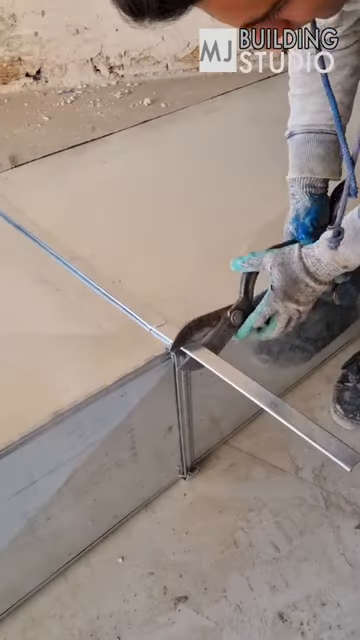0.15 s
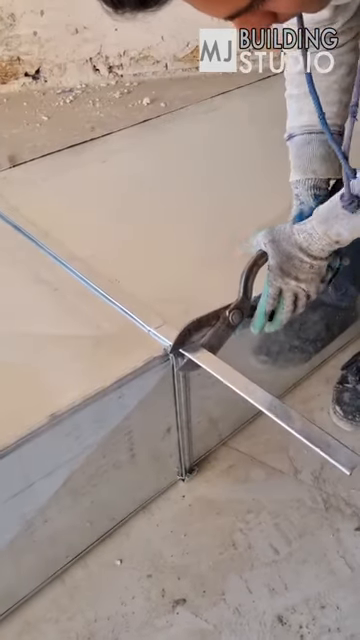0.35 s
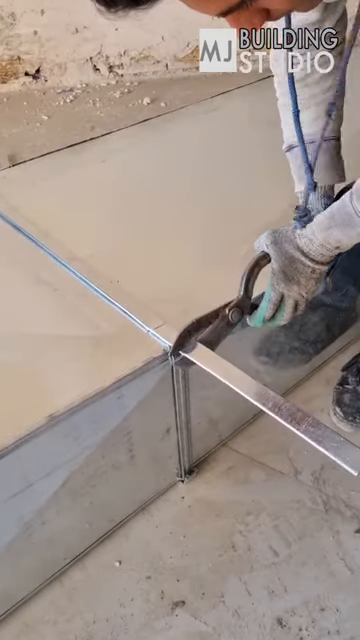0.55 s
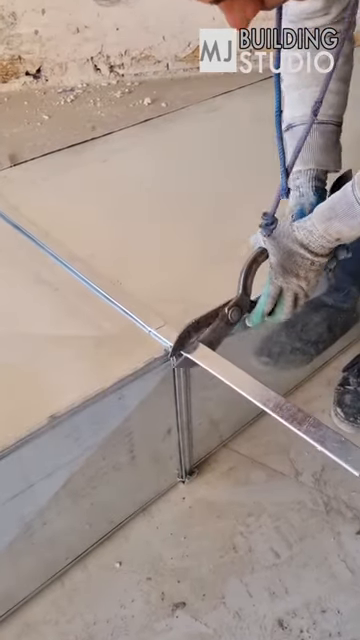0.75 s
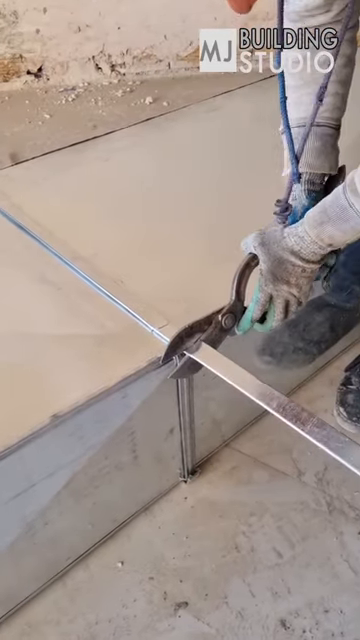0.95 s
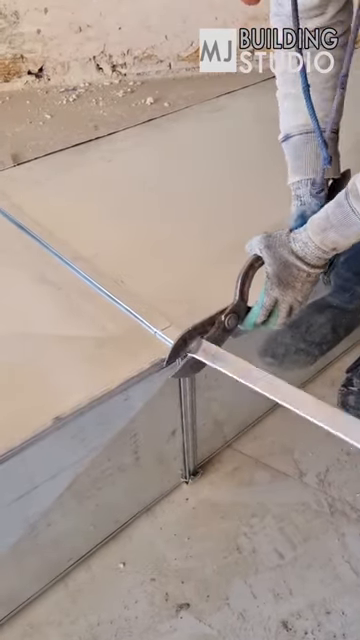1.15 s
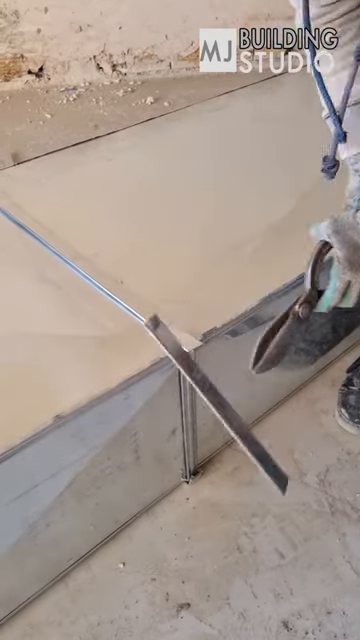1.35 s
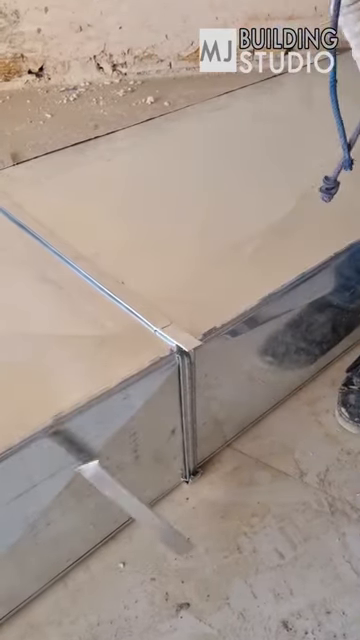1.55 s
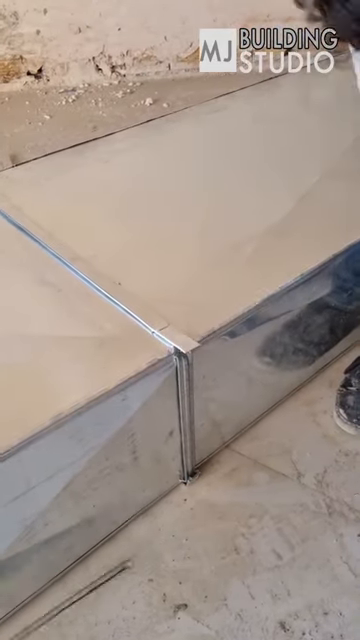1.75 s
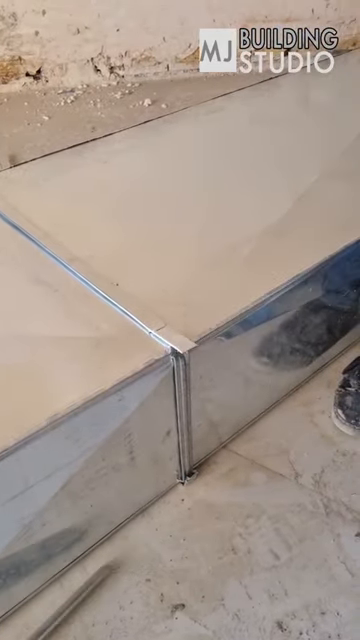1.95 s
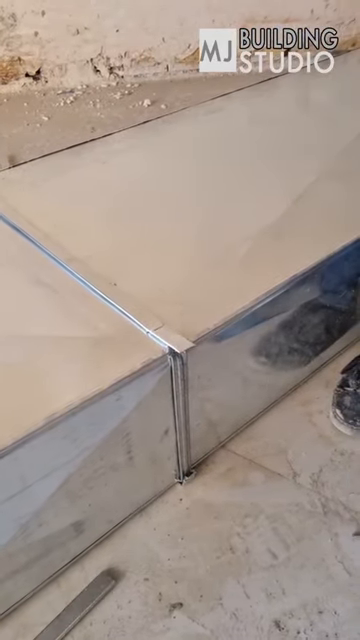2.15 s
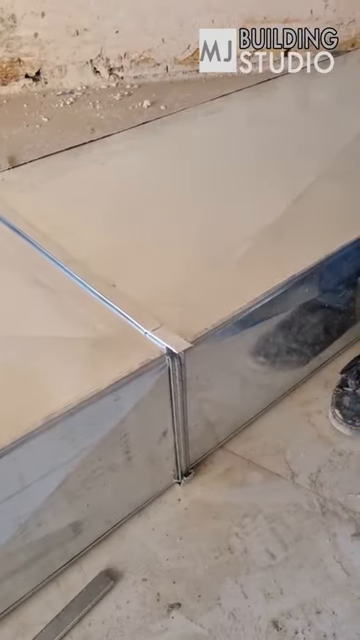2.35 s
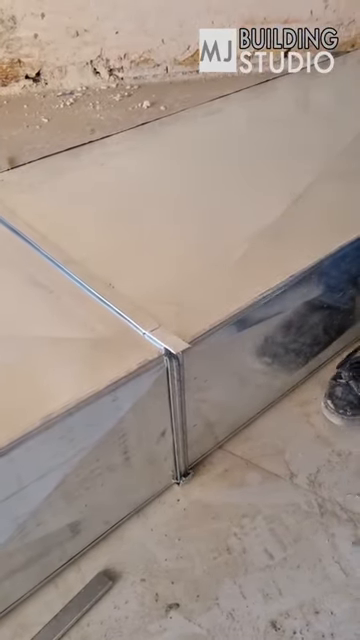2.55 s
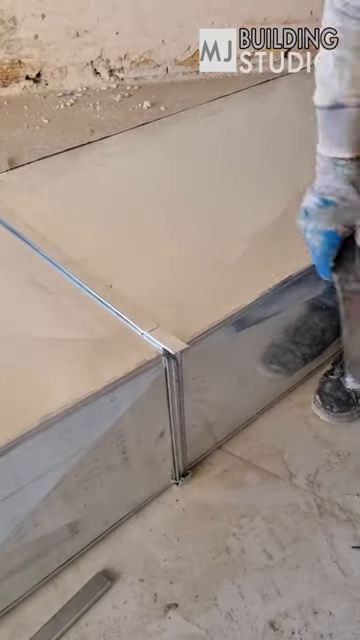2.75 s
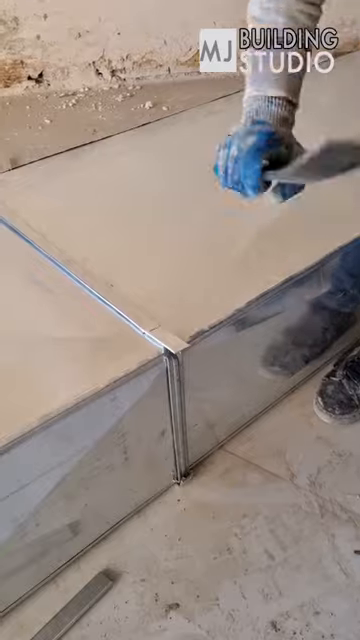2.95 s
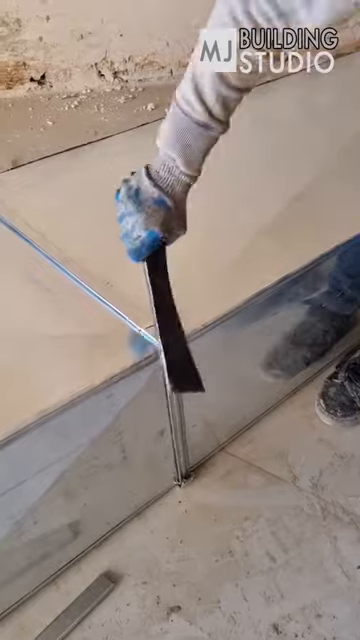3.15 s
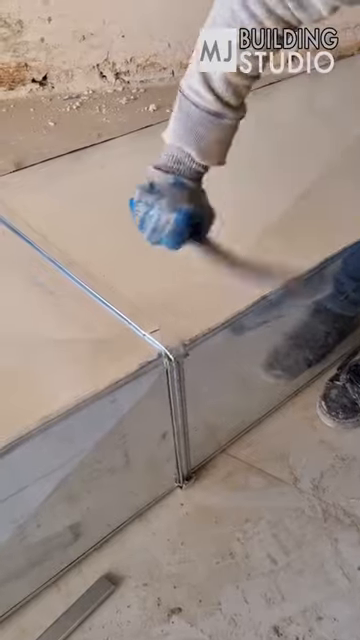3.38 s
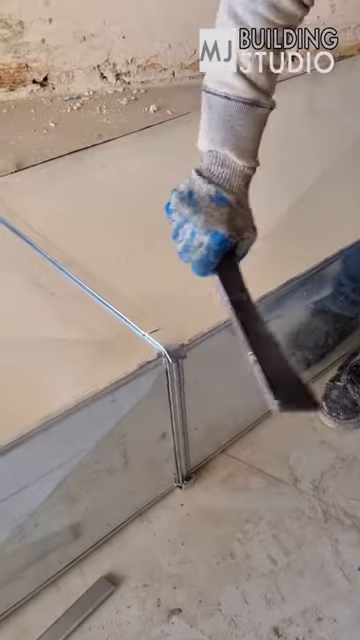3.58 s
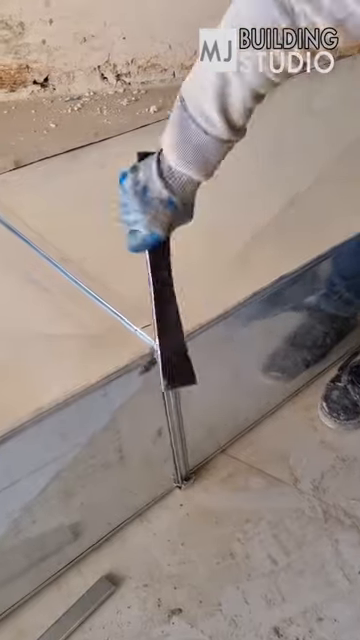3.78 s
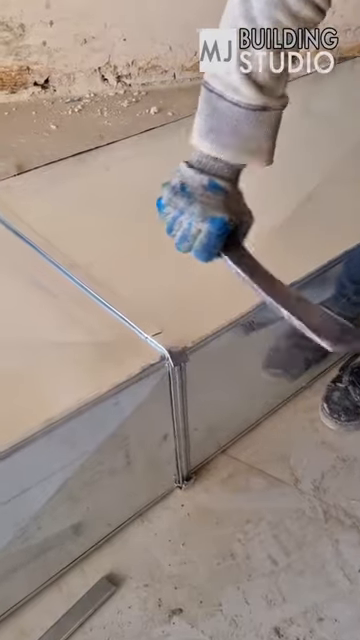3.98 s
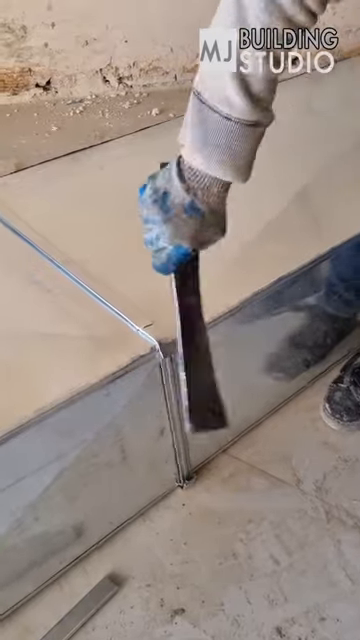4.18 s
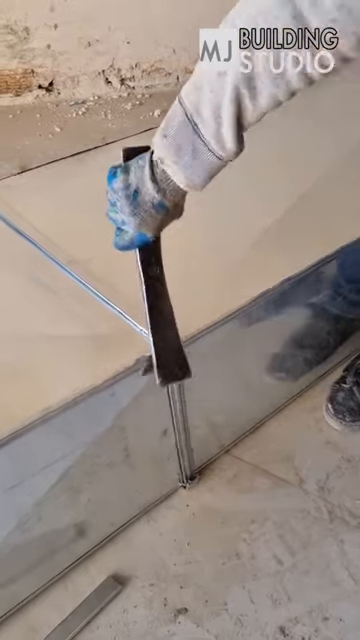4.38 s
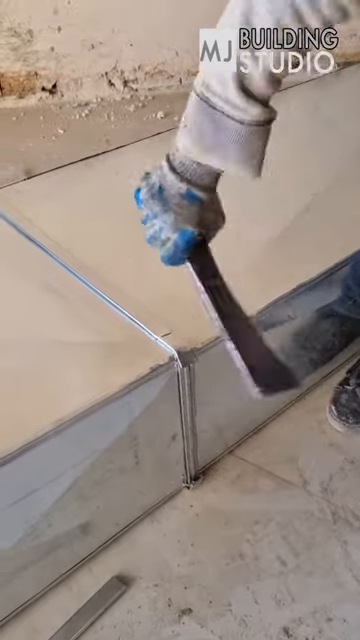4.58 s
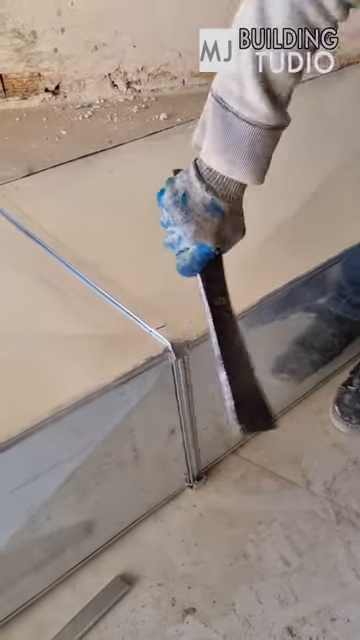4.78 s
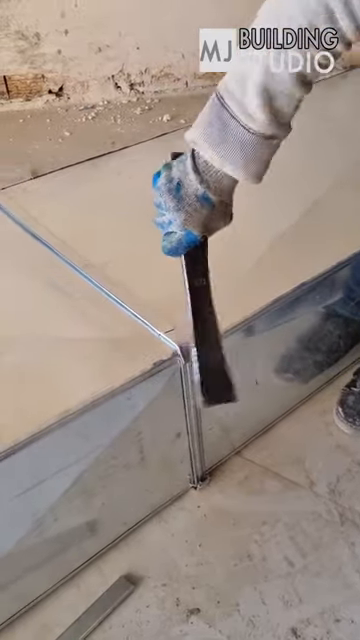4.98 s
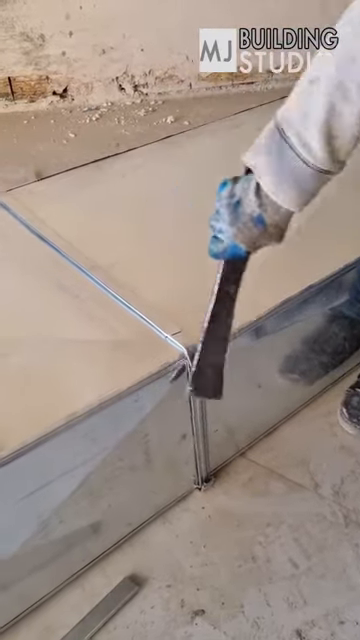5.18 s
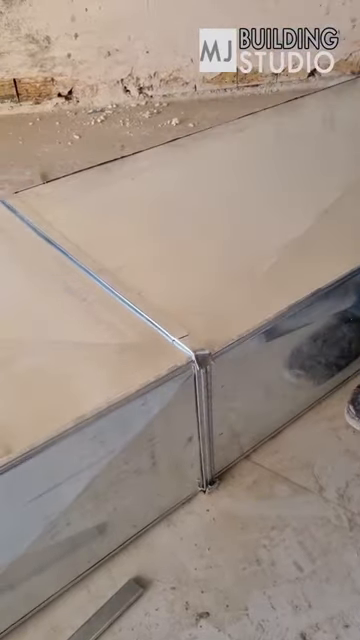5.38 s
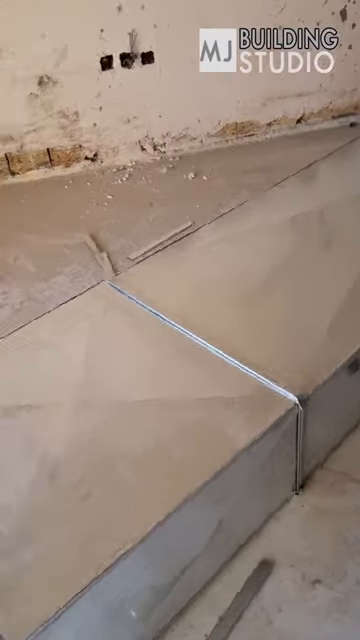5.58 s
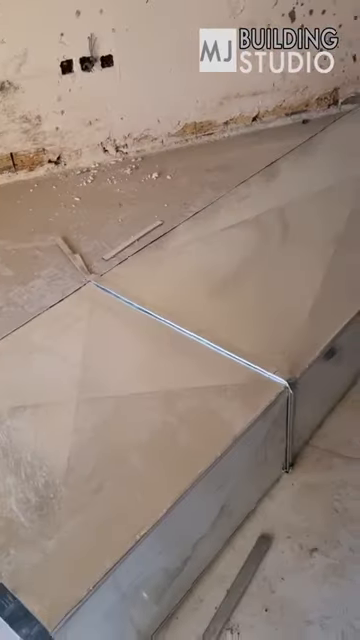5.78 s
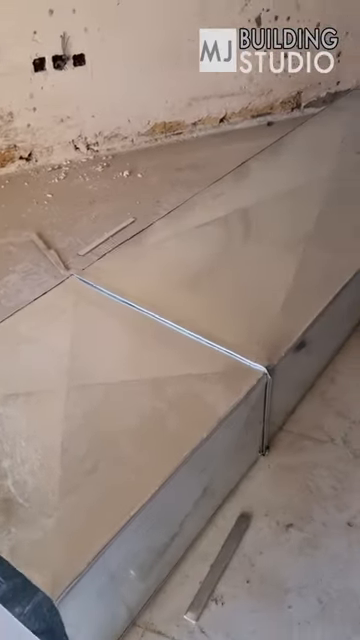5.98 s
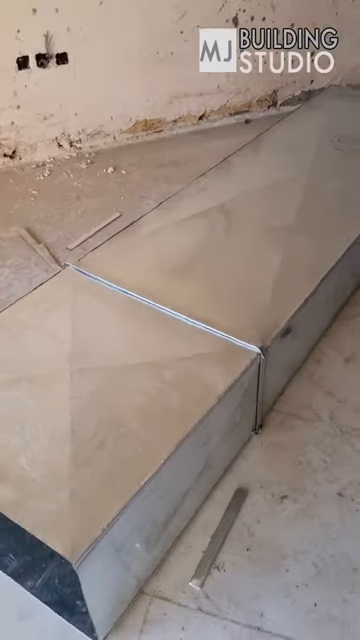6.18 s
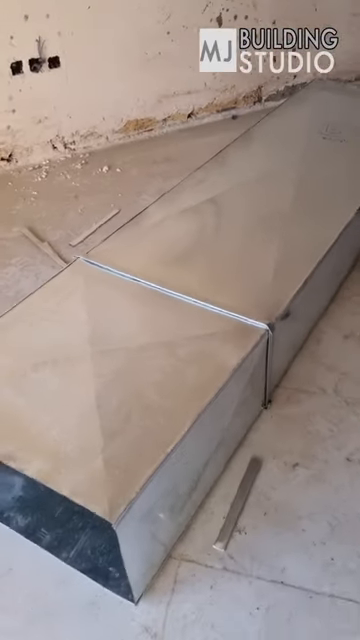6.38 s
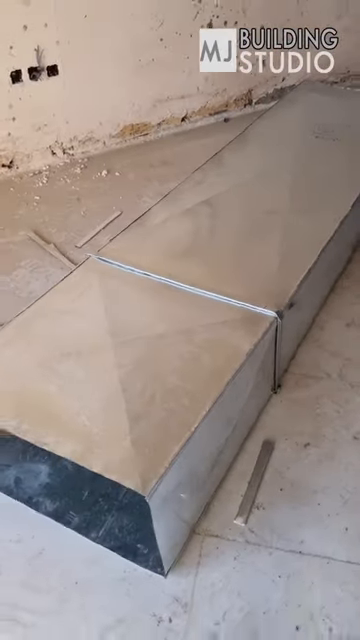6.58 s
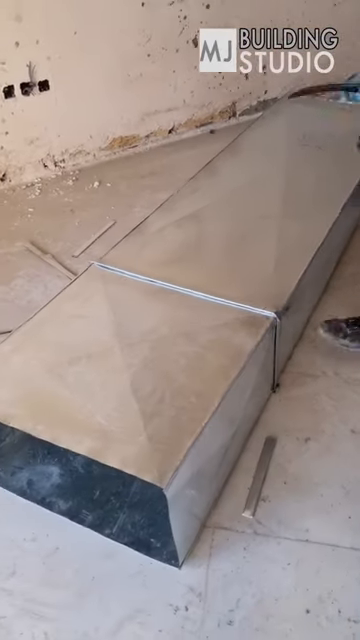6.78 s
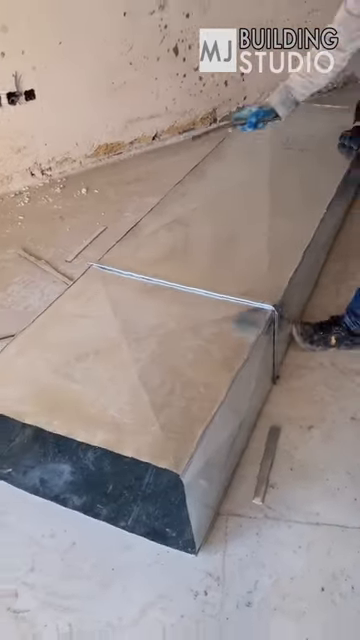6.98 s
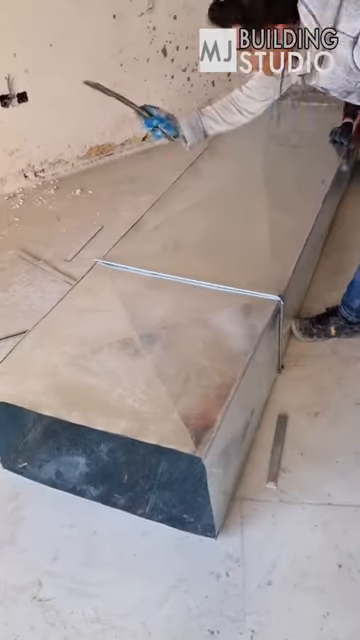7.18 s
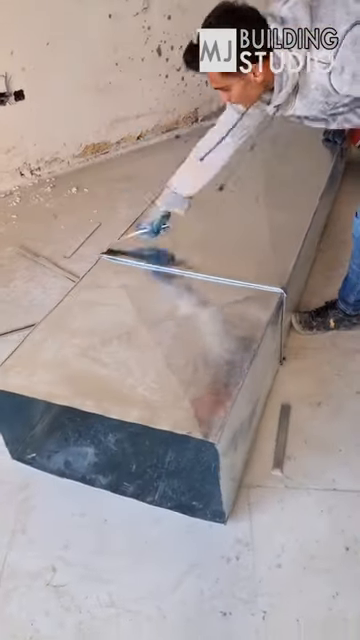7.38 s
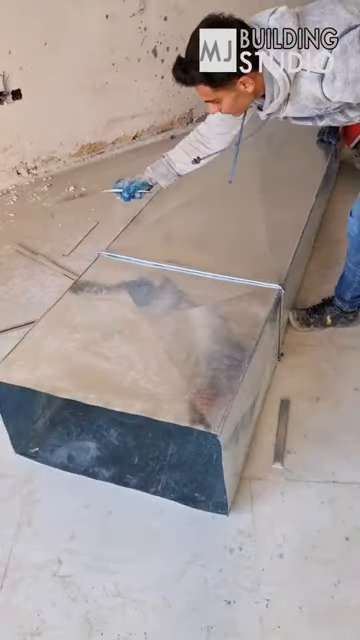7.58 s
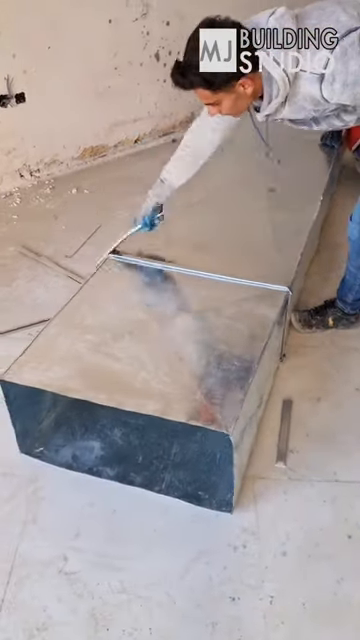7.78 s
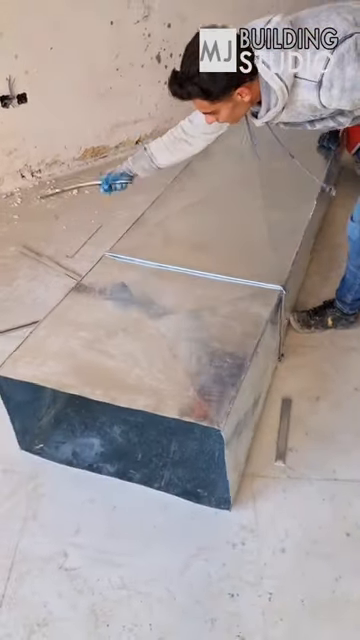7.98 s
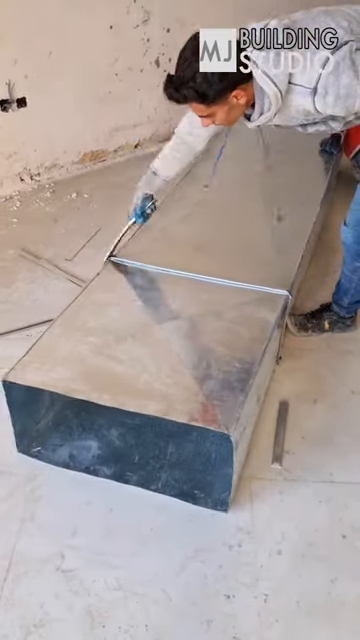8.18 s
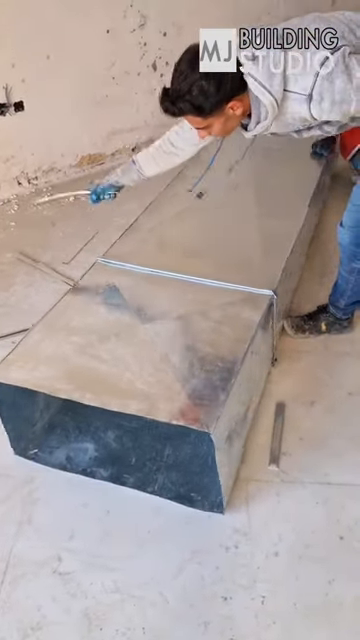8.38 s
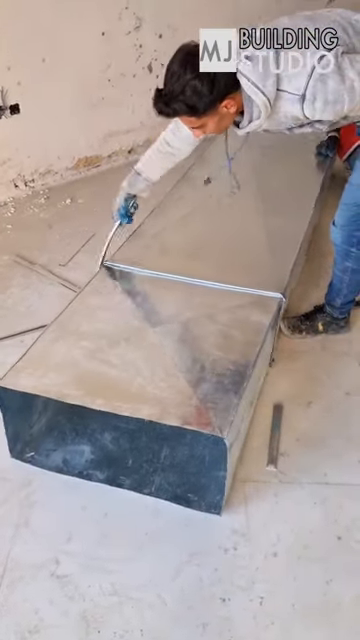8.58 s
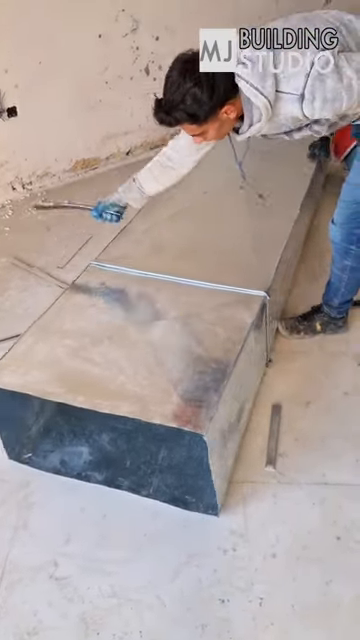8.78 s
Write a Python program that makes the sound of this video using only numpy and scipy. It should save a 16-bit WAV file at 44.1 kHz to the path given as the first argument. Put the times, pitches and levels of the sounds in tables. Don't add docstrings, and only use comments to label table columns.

```python
import sys
import numpy as np
from scipy import signal
from scipy.fft import rfft, irfft, next_fast_len
from scipy.io import wavfile
from scipy.ndimage import uniform_filter1d

SR = 44100
rng = np.random.default_rng(int(sys.argv[2]) if len(sys.argv) > 2 else 0)


def materialize(psi):
    bounded = np.clip(np.atleast_2d(psi).T, -1, 1)
    quanta = np.round(bounded * 32767).astype(np.int16)
    wavfile.write(sys.argv[1], SR, quanta)


def undo_db(level):
    steps = np.asarray(level, float) / 20
    return 10 ** steps


N = 389844
FAST = next_fast_len(N)
FREQ = np.fft.rfftfreq(FAST, 1 / SR)
TIME = np.arange(N) / SR
BANDS_HZ = 40 * 2 ** np.arange(0, 8.8, 1 / 3)

# time in seconds, level in dB.
SITE_LEVEL = [(0, -23.5), (.36, -32), (.8, -26.5), (1.2, -34.5), (1.5, -32.5), (2.0, -39), (2.35, -42.5),
              (2.7, -41), (3.14, -41.5), (5.6, -34), (5.77, -36), (6.0, -32.5), (6.5, -30.5), (6.8, -31.5),
              (6.97, -26.5), (7.3, -30.5), (8.8, -33.5)]
# frequency in Hz, density in dB per Hz.
SITE_COLOUR = [(21, -35), (35, -17), (60, -5), (115, -11), (165, -10), (230, -9.5), (340, -11), (560, -15),
               (800, -13), (1550, -17), (2300, -18), (4800, -27.5), (7000, -34.5), (14800, -46.5)]
SITE_PARTS_HZ = [110, 600, 3000, 10000]
SITE_PARTS_DB = [-1.5, 0.1, -14, -28]
# frequency in Hz, width in Hz, level in dB.
DRONE_RESONANCES = [(58, 1.5, 6), (115, 6, -5), (228, 9, 0), (345, 7, -2), (410, 7, -7), (455, 7, -6),
                    (515, 7, -5)]
# start in seconds, hold in seconds, level in dB, centre in Hz.
SHOVES = [
    (.25, .95, -31, 89),
    (0.597, .16, -20, 89),
    (1.415, .08, -26, 99),
    (1.93, .12, -36, 654),
    (2.3, 0.94, -47.5, 99),
    (6.94, .4, -24, 130),
]
# start in seconds, hold in seconds, level in dB, centre in Hz.
SCRAPES = [
    (.46, 0.11, -48, 12500),
    (.8, .52, -44.5, 12500),
    (1.3, .08, -36.5, 2590),
    (1.76, 0.38, -35, 2500),
    (2.07, .07, -43, 10000),
    (2.3, 0.24, -55, 12500),
    (2.3, 0.17, -45, 3420),
    (6.26, 0.1, -60, 9000),
    (7.06, 0.16, -52.5, 7950),
]
# time in seconds, level in dB, top panel level in dB.
BUMPS = [
    (.585, -17.5, -2),
    (.64, -20.5, -12),
    (1.262, -20, 0),
    (6.925, -16, -3.5),
    (6.992, -22.5, 1.1),
    (7.079, -23, 0.5),
    (7.22, -23, -3),
]
# time in seconds, peak in dB, boom in dB, brightness in dB per octave.
SNIPS = [(0.2086, -29, -6, -4), (0.3216, -35, -25, -17), (0.454, -32, 3, 1.5), (0.5826, -20, 20, -2.5),
         (0.631, -4, -7.5, -4.5), (0.8794, -27, 5, -10.5), (1.0077, -37, -5, 7), (1.1344, -36, -3, -1),
         (1.2487, -8.5, 5, 1.5), (1.269, -13, -5, -7), (2.522, -38.5, 6, -1.5), (2.6628, -40, 11, 1),
         (5.642, -32.5, -16, 0.5), (6.2394, -40, -3, 4), (6.9294, -43, 10, 1), (7.1294, -33, -2, -3),
         (7.2994, -36, -10, -10)]
# frequency in Hz, density in dB per Hz.
BITE_COLOUR = [(21, -36), (35, -4.5), (129, 1.5), (443, -18), (516, -24), (602, -14.5), (1550, -35),
               (2220, -16.5), (3710, -8.5), (6690, -8), (9830, -17), (14400, -11), (16000, -12)]
# time in seconds, ring in Hz, level in dB.
JAWS = [
    (0.3216, 3520, -48),
    (0.454, 2160, -42.5),
    (0.5826, 3250, -29),
    (0.631, 2320, -18.5),
    (1.249, 5250, -18.5),
    (6.9294, 1970, -42.5),
]
# time in seconds, peak in dB, note woken most in Hz, its lift in dB.
LANDINGS = [(1.5667, -11.5, 3170, 4.5), (1.7582, -20, 4000, -6), (1.779, -23.5, 7300, 6),
            (1.825, -32.5, 1895, 22), (1.859, -14, 3900, 0), (1.885, -32.5, 1895, 22),
            (1.923, -23.5, 3300, 5), (2.022, -27.5, 7350, 7), (2.046, -19.5, 7300, 1),
            (2.0717, -19.5, 5800, -2), (2.161, -21, 3300, 5), (2.191, -30, 2600, 20.5),
            (2.23, -30, 2560, 23), (2.29, -37, 2600, 20), (2.35, -41, 4100, 9)]
# time in seconds, level in dB.
CHATTER = [(1.74, -84), (1.77, -29), (1.85, -30), (2.0, -30.5), (2.08, -17), (2.14, -24), (2.22, -25.5),
           (2.3, -37), (2.4, -70)]
# time in seconds, frequency in Hz, level in dB, fade in ms.
CLANGS = [(.3235, 3600, -21, 9), (.5855, 3550, -17, 8), (1.2696, 6600, -13, 7), (1.5672, 4000, -5, 6),
          (1.5672, 7600, -12, 7), (1.5672, 1050, -22, 8), (1.5672, 5600, -16, 6), (1.8595, 7400, -1, 3.5),
          (1.8595, 7800, -12, 3), (1.873, 7350, -13, 6), (2.047, 7350, -15, 5), (2.524, 3300, -36, 6),
          (2.663, 4700, -40, 5)]
# frequency in Hz, level in dB, t60 in seconds.
STRIP_MODES = [(1755, -22, .4), (1895, -11, .45), (2180, -16, .3), (2471, -18, .4), (2590, -11, .5),
               (2650, -13, .3), (3155, 0, .22), (3305, -4, .2), (3600, -10, .25), (3735, -7, .2),
               (3811, -6, .3), (3903, -4, .2), (4140, -7, .3), (4500, -13, .3), (4840, -11, .3),
               (5250, -14, .2), (5530, -10, .3), (5800, -12, .25), (6430, -14, .25), (6595, -11, .15),
               (7050, -10, .18), (7200, -6, .14), (7390, -4, .16), (7700, -9, .1), (8726, -18, .2),
               (9345, -18, .2), (10940, -22, .2), (12270, -20, .15), (13270, -20, .15), (14240, -18, .15)]
# frequency in Hz, level in dB, t60 in seconds, panel (0 side, 1 top).
PANEL_MODES = [(68.5, -9.5, 0.95, 0), (89.2, -3.5, 0.52, 0), (99.9, -10, 0.74, 0), (137, -0.5, 0.76, 1),
               (145.1, -13, 0.72, 1), (189.7, 0, 0.22, 0), (231.1, -10, 0.52, 0), (348.5, -6.5, 0.33, 1),
               (374.5, -9, 0.34, 0), (414, -7.5, 0.5, 0), (499, -20, 0.34, 1), (654, -7, 0.54, 1),
               (796, -6.5, 0.27, 1), (866, -17.5, 0.4, 1), (1065, -10.5, 0.43, 0)]
# time in seconds, peak in dB, boom in dB, top panel level in dB.
BLOWS = [(3.1714, -5.5, -1, -1), (3.5052, -8, -5.5, -7), (3.828, -7.5, -10, -5), (4.1352, -10, -3, -0.5),
         (4.4329, -8, -11.5, -1), (4.7071, -9, -9, -0.5), (4.954, -6.5, -18.5, -1.5),
         (5.134, -8.5, -6, 2.5), (7.4658, -8, -5, 3.5), (7.8464, -8.5, -13.5, 3.5), (8.2189, -10, -14, 3),
         (8.5883, -9.5, -10.5, -4)]
# frequency in Hz, density in dB per Hz.
ROAR_COLOUR = [(21, -51), (35, -22.5), (82, 0.5), (140, -3.5), (163, -3), (233, -6.5), (317, -5), (420, -7),
               (490, -9.5), (1330, -15), (3180, -23.5), (7050, -26), (10600, -37), (14800, -32),
               (16000, -30.5)]
# frequency in Hz, t60 in seconds, build-up in ms, likeness of ports 0-1.
BODY = [(50, 1.28, 67, 1), (130, 0.89, 19, 0.96), (345, 0.58, 55, 0.85), (880, 0.93, 29, 0.25),
        (2320, 0.8, 30, 0.06), (6030, 0.55, 14.6, 0.05), (13900, 0.47, 3.3, 0)]
# frequency in Hz, gain in dB.
PORT_RESPONSE = [(25, -29), (40, -14), (52, -2.5), (70, -1.5), (5200, 0.5), (6800, 7), (7800, 5),
                 (9000, -1), (15300, 1), (15900, -30), (17000, -69)]

PORT_LAG, LEFT_DB = 4, -1
USUAL_BLOW_DB = -9
CRACK_DB, CRACK_PER_DB = 0.1, -1.03
SIDE_PANEL_DB, SIDE_PER_DB = 4, -0.25
EDGE_HZ, EDGE_DB, NOTE_OCTAVES = 3900, 7, 0.08
HANDLING_ATTACK_S, HANDLING_RELEASE_S, HANDLING_OCTAVES = 0.02, 0.041, 0.7
DRONE_OVER_SITE_DB, DRONE_FULL_S, DRONE_RISE_DB_PER_S = 2.2, 2.9, 11


def on_log(hz, table, column=1):
    table = np.array(table, float)
    return np.interp(np.log(hz), np.log(table[:, 0]), table[:, column])


def bell(hz, centre_hz, octaves):
    return np.exp(-0.5 * (np.log2(hz / centre_hz) / octaves) ** 2)


def band_power(spectrum):
    power = undo_db(on_log(BANDS_HZ, spectrum)) ** 2 * BANDS_HZ
    return power / power.sum()


def impulses(times, sizes):
    return np.bincount((np.asarray(times) * SR).astype(int), sizes, N)


def fade(x, t60, rise_ms):
    fall = np.exp(-np.log(1e6) / (t60 * SR))
    rise = np.exp(-1000 / (max(rise_ms, 0.1) * SR))
    return signal.lfilter([1 - rise], np.convolve([1, -fall], [1, -rise]), x)


def mode(x, hz, t60):
    pole = np.exp(2j * np.pi * hz / SR - np.log(1000) / (max(t60, 0.005) * SR))
    return signal.lfilter([0, pole.imag], [1, -2 * pole.real, abs(pole) ** 2], x)


def flicker(db, rate):
    hold = int(SR / rate)
    aims = undo_db(db * rng.standard_normal(N // hold + 1))
    return uniform_filter1d(np.repeat(aims, hold), hold)[:N]


def ports(x, lag=PORT_LAG, left_db=0):
    return np.array([undo_db(left_db) * np.roll(x, lag), x])


def dense_modes():
    near, left, right = rng.standard_normal((3, N))
    shared, apart = rfft(ports(near), FAST), rfft([left, right], FAST)
    for hz in BANDS_HZ:
        share = np.clip(on_log(hz, BODY, column=3), 0, 1)
        octave_thirds = np.clip(np.log2(FREQ / hz + 1e-9) * 3, -1, 1)
        window = np.cos(octave_thirds * np.pi / 2)
        mixed = np.sqrt(share) * shared + np.sqrt(1 - share) * apart
        band = irfft(mixed * window, FAST)[:, :N]
        yield band / band.std()


def handling_energy():
    start, hold, db, hz = np.transpose(SHOVES + SCRAPES)[:, :, None]
    since = TIME - start
    attack = np.clip(1 + since / HANDLING_ATTACK_S, 0, 1) ** 2
    release = np.exp(-np.maximum(since - hold, 0) / HANDLING_RELEASE_S)
    effort = undo_db(db) ** 2 * attack * release
    spread = bell(BANDS_HZ, hz, HANDLING_OCTAVES) ** 2
    return (spread / spread.sum(axis=1, keepdims=True)).T @ effort


def site():
    level = undo_db(np.interp(TIME, *np.transpose(SITE_LEVEL))) ** 2
    place = np.interp(np.log(BANDS_HZ), np.log(SITE_PARTS_HZ), np.arange(len(SITE_PARTS_DB)))
    power = band_power(SITE_COLOUR)
    held_db = 10 * np.log10(np.bincount(np.round(place).astype(int), power))
    part_db = SITE_PARTS_DB - held_db
    power = power * undo_db(np.interp(place, np.arange(len(part_db)), part_db)) ** 2
    near = handling_energy()
    out = 0
    for k, band in enumerate(dense_modes()):
        out = out + np.sqrt(power[k] * level + near[k]) * flicker(2.3, 11) * band
    return out


def drone():
    shape = sum(undo_db(db) / (1 + (2 * (FREQ - hz) / width) ** 2) for hz, width, db in DRONE_RESONANCES)
    hum = irfft(rfft(rng.standard_normal(N), FAST) * shape, FAST)[:N]
    rise_db = DRONE_RISE_DB_PER_S * np.minimum(TIME - DRONE_FULL_S, 0)
    level_db = np.interp(TIME, *np.transpose(SITE_LEVEL)) + DRONE_OVER_SITE_DB + rise_db
    return ports(hum / hum.std() * undo_db(level_db))


def jaws():
    shake = rng.standard_normal(N)
    out = np.zeros(N)
    n = SR
    t = TIME[:n]
    for start, hz, db in JAWS:
        i = int(start * SR)
        push = shake[i:i + n]
        note = mode(push, hz, 0.016)
        note = note + 0.8 * mode(push, 1.14 * hz, 0.008) + 0.6 * mode(push, 1.27 * hz, 0.008)
        die_away = np.exp(-t / 0.16 * (hz / 2200) ** 2)
        swell = 1 - 0.51 * np.exp(-t / 0.038)
        out[i:i + n] += undo_db(db + 5.0) * note / note.std() * die_away * swell
    return ports(out)


def clangs():
    out, t = np.zeros(N), TIME[:SR // 10]
    for start, hz, db, fade_ms in CLANGS:
        swell = (1 - np.exp(-t / 0.0012)) * np.exp(-1000 * t / fade_ms)
        out[int(start * SR):][:len(t)] += undo_db(db) * swell * np.sin(2 * np.pi * hz * t)
    return out


def strip_ring(strip):
    start, peak_db, note_hz, lift_db = np.transpose(LANDINGS)
    hz, mode_db, t60 = np.transpose(strip)[:, :, None]
    ring, t = np.zeros(N), TIME[:int(0.4 * SR)]
    free = np.exp(-np.log(1000) * t / t60)
    gap = np.append(np.diff(start), 1)
    for k, begin in enumerate(start):
        mix, bend, phase = rng.standard_normal((3, *hz.shape))
        note_db = lift_db[k] * bell(hz, note_hz[k], NOTE_OCTAVES)
        blow_db = peak_db[k] + note_db + EDGE_DB * bell(hz, EDGE_HZ, NOTE_OCTAVES)
        swing = undo_db(0.6 * blow_db + 12) * np.exp(-t / 0.006)
        tones = np.sin(2 * np.pi * hz * (1 + 0.002 * bend) * t + 9 * phase)
        sound = undo_db(blow_db + mode_db - 12.5 + 2.8 * mix) * (free + swing) * tones
        stifled = np.exp(-np.maximum(t - gap[k], 0) / 0.16)
        onset = 1 - np.exp(-t / 0.0004)
        ring[int(begin * SR):][:len(t)] += sound.sum(axis=0) * stifled * onset
    return ring


def strip_chatter(strip):
    span = slice(int(1.7 * SR), int(2.9 * SR))
    level = undo_db(np.interp(TIME, *np.transpose(CHATTER), left=-200, right=-200))
    knocks = ((rng.random(N) < 400 / SR) * level)[span]
    out = np.zeros(N)
    for hz, db, t60 in strip:
        out[span] += undo_db(db - 14.0) * mode(knocks * rng.standard_normal(len(knocks)), hz, 0.41 * t60)
    return out


def offcut():
    crowd_hz = np.geomspace(2700, 15000, num=60) * rng.uniform(0.985, 1.015, size=60)
    strip = STRIP_MODES + [(hz, -15 - 3 * np.log2(hz / 4000), 0.16) for hz in crowd_hz]
    start, peak_db, _, _ = np.transpose(LANDINGS)
    crack_energy = fade(impulses(start, undo_db(peak_db + 0.5) ** 2), 0.05, 0.95)
    crack = np.sqrt(crack_energy) * rng.standard_normal(N)
    crack = signal.lfilter(*signal.butter(2, 2500, "high", fs=SR), crack)
    near = strip_ring(strip) + strip_chatter(strip) + clangs() + crack
    walls = rng.standard_normal((2, SR // 2)) * np.exp(-TIME[:SR // 2] / 0.075) * undo_db(-38)
    echo = signal.fftconvolve(near[None], walls, axes=1)[:, :N]
    return ports(near, lag=1, left_db=-4.5) + echo


def panels():
    start, db, top_db = np.vstack([np.delete(BLOWS, 2, axis=1), BUMPS]).T
    is_blow = np.arange(len(start)) < len(BLOWS)
    side_db = is_blow * (SIDE_PANEL_DB + SIDE_PER_DB * (db - USUAL_BLOW_DB))
    panel_db = side_db, top_db
    mix = rng.standard_normal((len(start), len(PANEL_MODES)))
    out = 0
    for k, (hz, mode_db, t60, panel) in enumerate(PANEL_MODES):
        push = impulses(start, undo_db(db + panel_db[round(panel)] + 2 * mix[:, k]))
        ring = mode(mode(push, hz, t60), hz, 0.33 * t60)
        out = out + undo_db(mode_db - 3.5) * ring * 40 / (t60 * SR)
    return ports(out)


def duct():
    blow_s, blow_db, boom_db, _ = np.transpose(BLOWS)
    crack_db = CRACK_DB + CRACK_PER_DB * (blow_db - USUAL_BLOW_DB)
    bite_s, bite_db, thud_db, tilt_db = np.transpose(SNIPS)
    out = 0
    for hz, roar, bite, band in zip(BANDS_HZ, band_power(ROAR_COLOUR), band_power(BITE_COLOUR), dense_modes()):
        t60, rise_ms = on_log(hz, BODY), on_log(hz, BODY, column=2)
        low, high = 1 / (1 + (hz / 200) ** 2), 1 / (1 + (4000 / hz) ** 2)
        blow = roar * undo_db(blow_db + 4.5 + low * (boom_db - 2.0) + high * crack_db) ** 2
        energy = fade(impulses(blow_s, blow), t60, rise_ms)
        energy = energy + fade(impulses(blow_s, blow * high * undo_db(2) ** 2), 0.05, 0.3)
        brightness_db = tilt_db * np.log2(max(hz, 1500) / 5000)
        cut = bite * undo_db(bite_db - 6.5 + low * thud_db + brightness_db) ** 2
        energy = energy + fade(impulses(bite_s, cut), 0.82 * t60, 0.5 * rise_ms)
        out = out + np.sqrt(energy) * flicker(0.99, 40) * band
    return out


def scene():
    sources = site() + drone() + jaws() + offcut() + panels() + duct()
    return sources * undo_db([[LEFT_DB / 2], [-LEFT_DB / 2]])


def top_cut(x):
    return signal.sosfilt(signal.butter(12, 16470, fs=SR, output="sos"), x)


def record(dry):
    heard = irfft(rfft(dry, FAST) * undo_db(on_log(FREQ + 1, PORT_RESPONSE)), FAST)[:, :N]
    power = uniform_filter1d(np.mean(heard ** 2, axis=0), int(0.02 * SR))
    envelope = np.sqrt(power + 1e-12)
    held = heard * np.minimum(1, (undo_db(-14.5) / envelope) ** 0.28)
    return top_cut(np.tanh(0.71 * held) / 0.89)


dry = scene()
out = record(dry)
materialize(out)
```